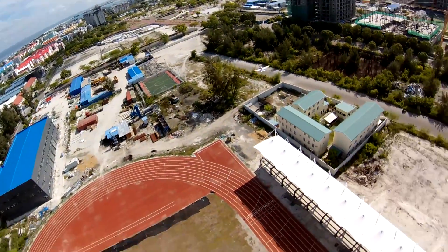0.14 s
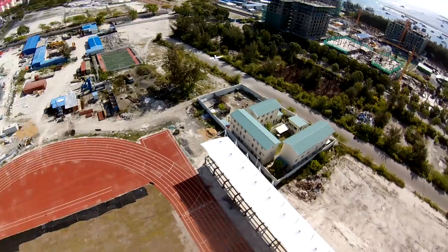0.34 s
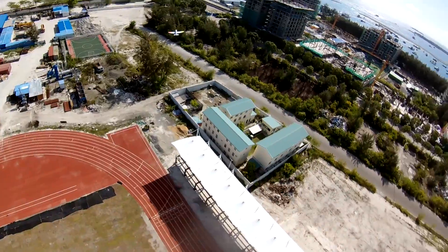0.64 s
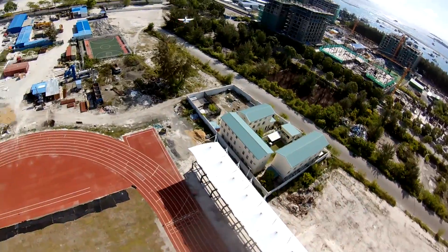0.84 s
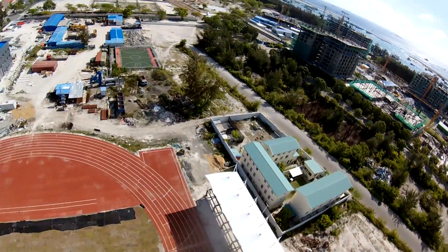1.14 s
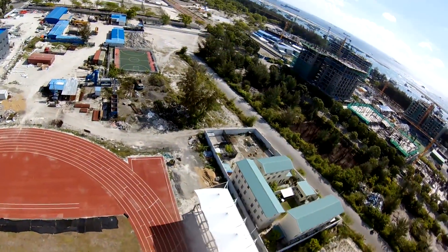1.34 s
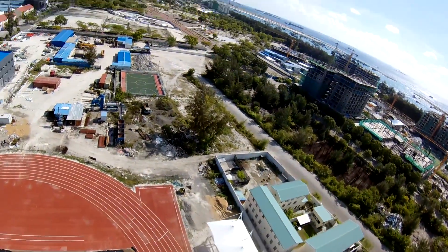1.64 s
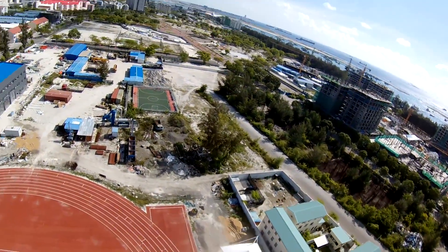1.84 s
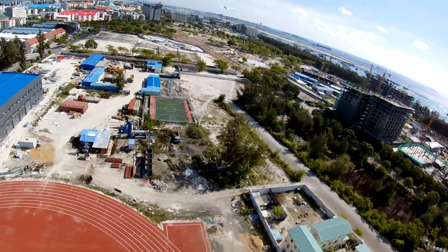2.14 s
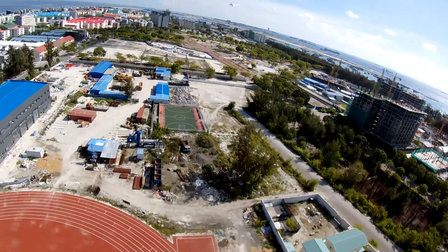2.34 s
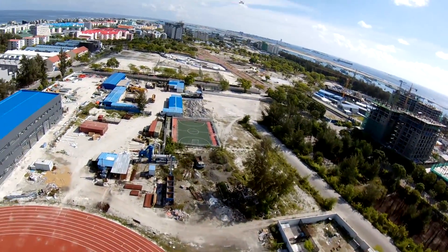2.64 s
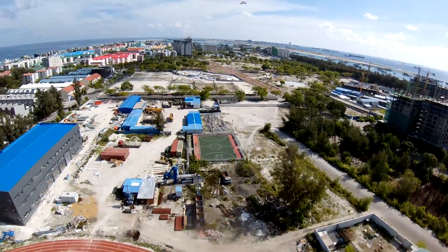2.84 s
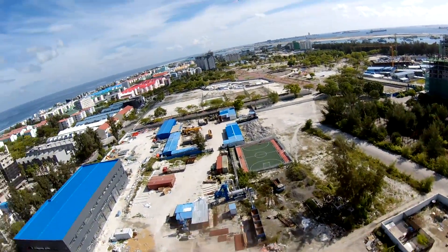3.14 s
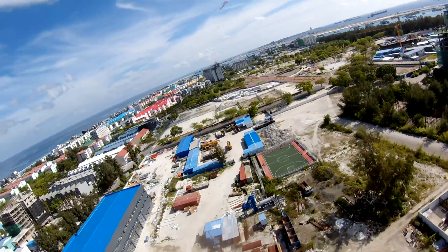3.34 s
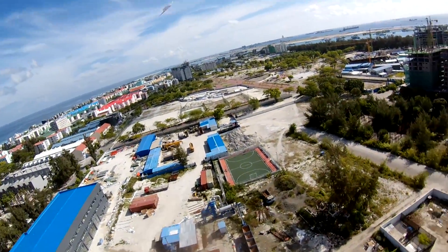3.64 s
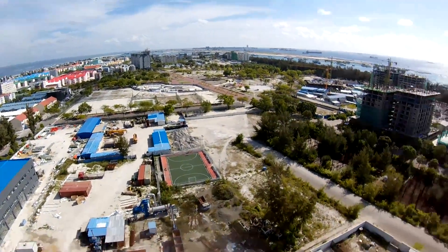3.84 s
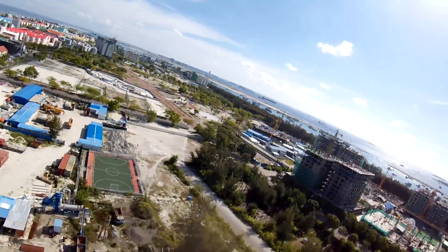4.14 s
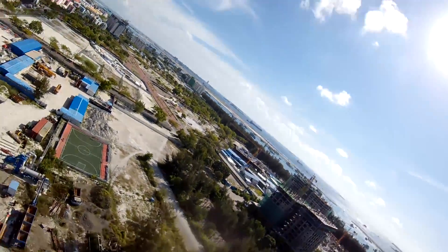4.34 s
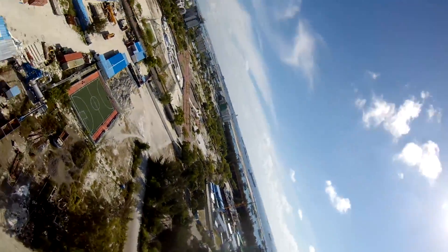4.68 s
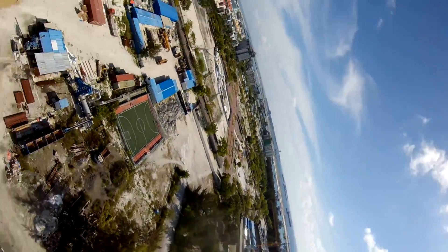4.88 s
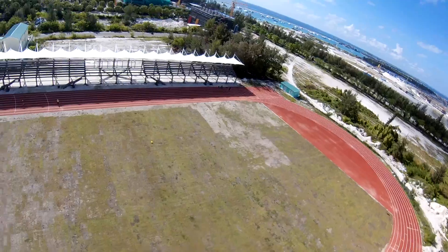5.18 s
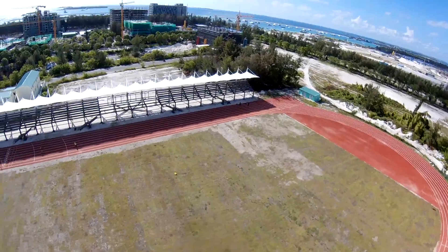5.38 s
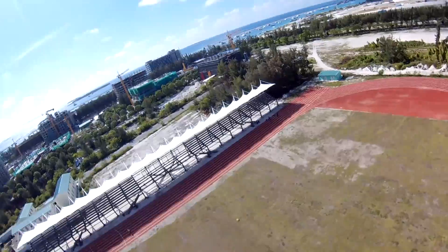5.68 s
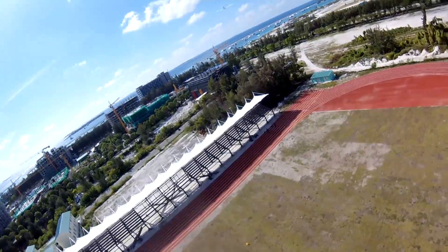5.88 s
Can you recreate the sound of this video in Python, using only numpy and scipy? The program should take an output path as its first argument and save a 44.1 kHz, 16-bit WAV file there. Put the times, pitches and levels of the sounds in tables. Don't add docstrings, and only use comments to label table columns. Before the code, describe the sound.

Wind buffets the housing of a microphone mounted on a model plane in open air. A faint wavering whistle and tiny dull ticks come from the idling rotor. Midway the electric motor opens up, its rasp and hum climbing to a steady drone; then a small bump cuts to stronger, hissier wind over a lighter hum.

```python
import sys
import numpy as np
from scipy import signal
from scipy.fft import rfft, irfft, next_fast_len
from scipy.io import wavfile
from scipy.ndimage import uniform_filter1d

SR = 44100
rng = np.random.default_rng(int(sys.argv[2]) if len(sys.argv) > 2 else 0)


def log_audio(samples):
    frames = np.atleast_2d(samples).T
    limited = np.clip(frames, -1, 1)
    pcm = np.round(limited * 32767).astype(np.int16)
    wavfile.write(sys.argv[1], SR, pcm)


def boost_factor(decibels):
    exponent = np.asarray(decibels, float) / 20
    return 10 ** exponent


N = 265318

THROTTLE_S, CHANGE_S = 3.5, 5.1479
CRUISE_DB = -28.5
# t/s, whistle f/Hz, level/dB
WHISTLE = [
    [(0, 2262, -53), (.1, 2205, -52), (.2, 2162, -52.5), (.33, 2100, -53)],
    [(.95, 2110, -58), (1.2, 2170, -53), (1.5, 2225, -53), (1.75, 2275, -56), (2.0, 2297, -52.5),
     (2.35, 2296, -56), (2.6, 2272, -51), (2.8, 2256, -51), (3.1, 2207, -52), (3.45, 2130, -59)],
]


def in_time(*tables):
    s, *columns = np.transpose(np.vstack(tables))
    return [np.interp(np.arange(N) / SR, s, c) for c in columns]


def after(s):
    return np.maximum(np.arange(N) / SR - s, 0)


def sounding(table, fade_s):
    t = np.arange(N) / SR
    return np.clip(np.minimum(t - table[0][0], table[-1][0] - t) / fade_s, 0, 1)


def bumps(rows):
    s, width, *columns = np.transpose(rows)
    coarse = np.arange(0, N + 40, 40)
    bell = np.exp(-.5 * ((coarse[:, None] / SR - s) / width) ** 2)
    return [np.interp(np.arange(N), coarse, bell @ c) for c in columns]


def at_hz(points, hz):
    point_hz, point_db = np.transpose(points)
    return np.interp(np.log(np.maximum(hz, 1)), np.log(point_hz), point_db)


def rms_one(x):
    return x / np.sqrt(np.mean(x ** 2) + 1e-20)


def drift(rate):
    r = np.exp(-80 * np.pi * rate / SR)
    noise = rng.standard_normal(N // 40 + 2002)
    slow = signal.lfilter([1], [1, -2 * r, r * r], noise)[2000:]
    return np.interp(np.arange(N) / 40, np.arange(len(slow)), rms_one(slow))


def coloured(colour):
    size = next_fast_len(N)
    hz = np.arange(size // 2 + 1) * SR / size
    inside = (hz >= colour[0][0]) & (hz <= colour[-1][0])
    spectrum = rfft(rng.standard_normal(size)) * boost_factor(at_hz(colour, hz)) * inside
    return spectrum / np.std(irfft(spectrum, size)), hz, size


def air():
    # t/s, buffeting roar level/dB, airflow level/dB re cruise
    course = [
        [(0, -30, -8.5), (.12, -35, -5.5), (.4, -30, -4.5), (.7, -32, 0.5), (1.0, -28, -1), (1.3, -24.5, 1),
         (1.55, -29, 2.5), (2.0, -27, -0.5), (2.45, -28.5, -1.5), (3.0, -29, 1), (3.3, -27, -4.5),
         (3.75, -30.5, -2.5), (4.2, -29.5, -1.5), (4.6, -32.5, -1.5), (5.147, -26, 2)],
        [(5.15, -22.5, 10), (5.6, -22.5, 8), (6.02, -22.5, 8.5)],
    ]
    # t/s, width/s, roar level/dB, airflow level/dB, low-roar excess level/dB
    gusts = [(.04, 0.041, -0.6, .1, 0), (.17, 0.057, 1.5, 0, -2.5), (.28, 0.08, 2.5, -0.5, -0.6),
             (.43, .03, 0, 6.5, 0.5), (.55, .05, 0, .1, -3), (.68, 0.072, 5, -1.5, -2),
             (.77, 0.054, 2.3, 0.5, -5.5), (.85, 0.013, 6, -0.5, -6), (1.01, .03, 0.5, 5, -2.5),
             (1.1, 0.036, -0.5, 1, 3), (1.21, 0.022, 4, -1, -0.5), (1.285, 0.017, -2, 1, -0.5),
             (1.34, .03, 1.5, -0.3, -.6), (1.5, 0.058, -0.4, -0.7, 1.7), (1.7, 0.06, 0, 0, -1.5),
             (1.8, 0.024, 1.5, 2, -4.5), (1.91, 0.069, 0.5, 0.3, 1.7), (2.1, 0.055, 0.9, -0.5, 0),
             (2.3, 0.065, -0.3, 1, 0.3), (2.45, .04, 0.1, -0.5, -0.3), (2.28, 0.0086, .6, -1, 1.5),
             (2.55, 0.025, 3, 0.5, -2), (2.578, 0.0049, 2, 2.5, -1.2), (2.69, 0.033, 2.5, -2.5, -3.5),
             (2.82, .05, 0.8, -1, 2), (2.96, 0.037, -0.5, -1.5, 2.3), (3.12, 0.026, 2, -2, 1),
             (3.31, 0.024, -2.5, 0.5, -6), (3.45, 0.079, 1.3, 0.5, 1.2), (3.65, 0.085, 1, 2, 5.5),
             (3.85, 0.071, -1.4, 2, 3), (4.13, 0.051, -2, 0.5, 3), (4.4, .08, -1.4, 2.5, 3.5),
             (4.8, 0.082, 1.5, -1, -1.5), (5.17, 0.018, 1, -0.2, 3.5), (5.27, 0.055, 1, -0.3, -1.7),
             (5.4, 0.055, 0.5, 0, -3), (5.535, 0.038, 4, 0.5, 0.5), (5.61, 0.032, 2, 0.3, -1),
             (5.68, 0.023, 0, -0.5, -4.5), (5.78, .04, 0.5, 0.5, -1), (5.9, 0.04, 4, 1, -0.5),
             (5.935, 0.015, -3.5, -1.5, 3.5)]
    return np.vstack([in_time(*course), np.zeros(N)]) + bumps(gusts)


def wind(gust_db, patchy_db):
    anchors_hz = [150, 350, 850, 3000, 5000]
    # f/Hz, level/dB per Hz
    colour = [(15, -83), (25, -60), (223, -6.5), (411, 0.5), (645, -0.5), (791, -2.5), (1190, -5),
              (1950, -16), (2280, -16.5), (2600, -20.5), (4200, -34), (5500, -54), (6100, -63), (6700, -84)]
    roar, flow, low = air()
    rumble_dip_db = -3.5 * sounding([[THROTTLE_S - .1], [CHANGE_S]], 0.11)
    rumble = 0.96 * (roar - CRUISE_DB + low) + rumble_dip_db
    edge = 1.52 * flow
    levels = CRUISE_DB + np.array([rumble, roar - CRUISE_DB + low, roar - CRUISE_DB, flow, edge])
    spectrum, hz, size = coloured(colour)
    out, buffet = 0, drift(31)
    for centre in 25 * 2 ** np.arange(0, 8.6, .5):
        octaves = np.log2(np.maximum(hz, 1) / centre)
        share = np.cos(np.pi * np.clip(octaves, -.5, .5)) ** 2
        weights = [np.interp(np.log(centre), np.log(anchors_hz), row) for row in np.eye(len(levels))]
        gain = boost_factor(weights @ levels + gust_db * buffet + patchy_db * drift(6))
        out = out + gain * irfft(spectrum * share, size)[:N]
    return out


def sizzle(flicker_db):
    # f/Hz, level/dB per Hz
    eddy_colour = [(4000, -10), (4500, 22), (5500, 19), (6100, 9), (6600, 0), (7000, 0), (8000, -1),
                   (9000, -4), (10000, -10), (11900, -17), (12050, -40)]
    # f/Hz, level/dB per Hz
    haze_colour = [(5500, -8.5), (6500, 2.5), (9000, -4), (11900, -9.5), (12050, -30)]
    # t/s, width/s, level/dB
    spits = [
        (5.585, 0.014, 10),
        (5.614, .004, 7),
        (5.642, .008, 10),
        (5.718, .015, 10),
        (5.79, 0.024, 13),
        (5.848, 0.0087, 12),
        (5.893, 0.016, 10),
        (5.97, .035, 2),
    ]
    spectrum, hz, size = coloured(eddy_colour)
    haze = boost_factor(-92) * irfft(coloured(haze_colour)[0], size)[:N]
    lull_db = -0.5 * (after(5.65) > 0)
    level_db = -79 + 1.72 * air()[1] + lull_db + bumps(spits)[0]
    return boost_factor(level_db + flicker_db * drift(120)) * irfft(spectrum, size)[:N] + haze


def whistle(flutter_db):
    hz, level_db = in_time(*WHISTLE)
    on = sum(sounding(table, 0.073) for table in WHISTLE)
    gain = np.sqrt(2) * boost_factor(level_db + flutter_db * drift(5.9))
    return on * gain * np.sin(2 * np.pi * np.cumsum(hz + 3.5 * drift(4)) / SR)


def flicks():
    # t/s, peak level/dB
    strong_ticks = [(.227, -61), (.42, -53), (.979, -52), (1.227, -53), (1.4, -53), (1.856, -53),
                    (1.907, -54), (2.04, -55), (2.108, -54), (2.123, -51), (2.332, -55), (2.435, -53),
                    (2.573, -49), (2.966, -52), (3.042, -55), (3.219, -58), (3.408, -54)]
    low_hz, high_hz = 3400, 4700
    turns = np.cumsum(in_time(*WHISTLE)[0]) / SR / 31.8
    turns -= turns[int(.033 * SR)]
    new_turn = np.diff(np.floor(turns), prepend=np.floor(turns[0])) > 0
    ticks = new_turn * (after(THROTTLE_S) == 0)
    clicks = ticks * boost_factor(-54 + air()[1] + 3 * rng.standard_normal(N))
    for s, db in strong_ticks:
        clicks[int(s * SR)] = boost_factor(db + 4.5)
    band = signal.butter(4, [low_hz, high_hz], "band", fs=SR, output="sos")
    return signal.sosfilt(band, clicks + 1e-18) * SR / (2 * (high_hz - low_hz))


def sweep():
    start_s, length_s, from_hz, to_hz = 3.555, .06, 3850, 5150
    part = np.clip((np.arange(N) / SR - start_s) / length_s, 0, 1)
    hz = from_hz + (to_hz - from_hz) * part
    envelope = np.sqrt(np.sin(np.pi * part) ** 2)
    return boost_factor(-53 - 14 * part) * envelope * np.sin(2 * np.pi * np.cumsum(hz) / SR)


def blade_rate():
    # t/s, blade rate f/Hz
    speed = [
        [(3.5, 106), (3.67, 136), (3.79, 162), (3.85, 170.8), (3.97, 182.2), (4.03, 192.8), (4.12, 216.3),
         (4.18, 226.5), (4.28, 241.3), (4.36, 249.6), (4.44, 254), (4.62, 257.2), (4.74, 257.1), (4.92, 258.6),
         (5.147, 261.8)],
        [(5.149, 258.2), (5.6, 255.7), (5.76, 253.5), (6.02, 254.3)],
    ]
    inertia = int(.04 * SR)
    first, second = (uniform_filter1d(in_time(part)[0], inertia, mode="nearest") for part in speed)
    return np.where(after(CHANGE_S) > 0, second, first)


def ringing(modes):
    out = 0
    for hz, width_hz, db in modes:
        peak = np.hstack(signal.iirpeak(hz, hz / width_hz, fs=SR))
        out = out + boost_factor(db) * rms_one(signal.sosfilt([peak] * 3, rng.standard_normal(N)))
    return signal.sosfilt(signal.butter(8, 4900, fs=SR, output="sos"), out)


def rasp():
    # f/Hz, width f/Hz, level/dB
    fuselage = [
        (1588, 170, 2),
        (2308, 430, 4),
    ]
    # f/Hz, width f/Hz, level/dB
    mount = [
        (3750, 400, 4),
        (4180, 460, 5),
        (2800, 600, 9),
        (4650, 400, -5),
    ]
    attack_s, hold_s, decay_s = 0.088, 0.13, 0.084
    since, blade_hz = after(THROTTLE_S - .02), blade_rate()
    fuselage_db = -54.5 + 9.5 * np.exp(-np.maximum(since - hold_s, 0) / decay_s)
    mount_db = -63.3 + .04 * (blade_hz - blade_hz.max()) - 7.5 * (after(CHANGE_S) > 0)
    body = boost_factor(fuselage_db) * ringing(fuselage) + boost_factor(mount_db) * ringing(mount)
    return np.minimum(since / attack_s, 1) ** 2 * body


def motor(wobble, waver, flutter_db, fade_hz):
    # blade rate f/Hz, level/dB
    hum = [(105, -71), (143, -55.5), (198, -38), (238, -33.5), (255, -25), (262, -24)]
    blade_multiples = [2, 2, 2.11, 3, 3, 3.11, 3.21, 5, 6, 12, 12.61, 14.97, 16.96, 14.97, 14.97, 2.04, 3.9,
                       6, 4.93]
    # level/dB, from blade f/Hz, to blade f/Hz
    blades = [(-35, 224, 247), (-40.5, 257.5, 270), (-40, 246, 257.5), (-37.5, 136, 216), (-38.5, 232, 255),
              (-39.5, 246, 270), (-42, 250, 270), (-46, 250, 340), (-42, 243, 255.5), (-59.5, 240, 270),
              (-60.5, 230, 270), (-54.5, 246, 254), (-65.5, 290, 270), (-47.5, 254, 257),
              (-51.5, 258.7, 270), (-40.5, 136, 178), (-37, 140, 175), (-51, 175, 200), (-50, 230, 222)]
    # multiple, level/dB, from and to blade f/Hz
    magnets = [(6.13, -39, 251, 270), (9.2, -36.5, 165, 270), (12.27, -46, 158, 175),
               (12.27, -40.5, 175, 218), (15.33, -45, 142, 196), (15.69, -46.5, 172, 270),
               (18.76, -47, 175, 270), (21.82, -48.5, 172, 270), (24.88, -53, 138, 270),
               (27.96, -58, 140, 165), (18.03, -39, 143, 163), (18.03, -46, 200, 243),
               (18.03, -50, 243, 270), (21.09, -52, 157, 186), (24.15, -51, 152, 174),
               (27.3, -55, 142, 165), (16.48, -44, 228, 250), (16.48, -53, 250, 270),
               (19.56, -53, 175, 212), (22.6, -51, 158, 184), (25.72, -53, 143, 168), (7.09, -40, 200, 232),
               (7.09, -46, 250, 270), (10.18, -45, 158, 170), (10.18, -48, 178, 236),
               (13.25, -53, 145, 172), (8.54, -48, 225, 270), (11.6, -52, 160, 200), (11.28, -46, 192, 225),
               (14.35, -49, 148, 182), (7.73, -41, 232, 270), (10.72, -51, 180, 222),
               (13.65, -54, 160, 178)]
    # f/Hz, level/dB
    airframe = [(1600, -10), (1740, -17), (1860, -7), (2120, -5.5), (2260, 2), (2365, 0), (2420, -3),
                (2520, -6), (2700, -16), (3000, -16), (3250, -14), (3550, -10), (3850, -11), (4300, -13)]
    louder_after_change = {7.73: 5}
    on = int(THROTTLE_S * SR)
    blade_hz, changed = blade_rate()[on:], after(CHANGE_S)[on:] > 0
    torque = np.clip(np.gradient(blade_hz) * SR / 100, 0, 3)
    angle = 2 * np.pi * np.cumsum(blade_hz * (1 + wobble * drift(13)[on:])) / SR
    tones = [(multiple, *row) for multiple, row in zip(blade_multiples, blades)]
    for multiple, db, low_hz, high_hz in magnets:
        magnet_db = db + 2 * torque + at_hz(airframe, multiple * blade_hz)
        tones.append((multiple, magnet_db, low_hz, high_hz))
    whine = 0
    for multiple, db, low_hz, high_hz in tones:
        heard = np.clip(np.minimum(blade_hz - low_hz, high_hz - blade_hz) / fade_hz + .5, 0, 1)
        muffle_db = -50 * np.maximum(multiple * blade_hz - 4400, 0) / 1000
        shake = drift(6.2)[on:]
        kept_db = louder_after_change.get(multiple, 0) * changed
        gain = boost_factor(db + kept_db + muffle_db + flutter_db * shake)
        phase = multiple * (angle + waver * shake[::-1]) + rng.uniform(0, 2 * np.pi)
        whine = whine + heard * gain * np.sin(phase)
    spool_db = -28 * np.maximum(1 - after(THROTTLE_S)[on:] / .22, 0)
    whine_db = spool_db - 5 * changed
    hum_db = at_hz(hum, blade_hz) + changed * (-5.5 + 1.4 * drift(5.5)[on:])
    driven = boost_factor(hum_db) * np.sin(angle) + boost_factor(whine_db) * whine
    return np.sqrt(2) * np.append(np.zeros(on), driven)


def scene():
    rush = wind(gust_db=0.63, patchy_db=0.33) + sizzle(flicker_db=3.0)
    idle = whistle(flutter_db=1.2) + flicks()
    driven = motor(wobble=.0005, waver=.03, flutter_db=.8, fade_hz=7) + rasp() + sweep()
    return (rush + idle + driven)[None]


def top_cut(x):
    return signal.sosfilt(signal.butter(12, 16000, fs=SR, output="sos"), x)


def record(dry):
    # f/Hz, width f/Hz
    dips = [
        (700, 36),
        (6500, 420),
        (7500, 260),
    ]
    for hz, width_hz in dips:
        dry = signal.lfilter(*signal.iirnotch(hz, hz / width_hz, fs=SR), dry)
    since = np.arange(N) / SR - CHANGE_S
    step = -0.115 * (since > 0) * np.exp(-np.maximum(since, 0) / 0.00051)
    return top_cut(dry + step)


dry = scene()
out = record(dry)
log_audio(out)
```